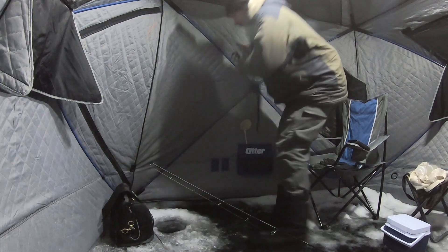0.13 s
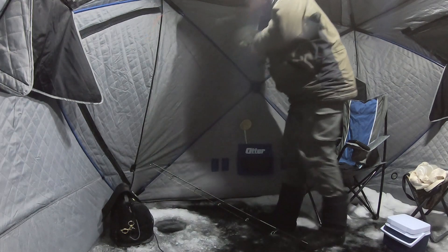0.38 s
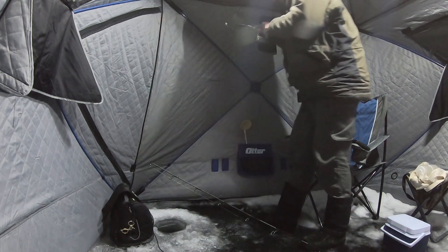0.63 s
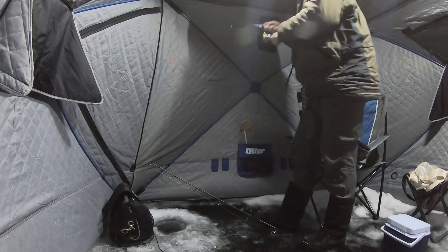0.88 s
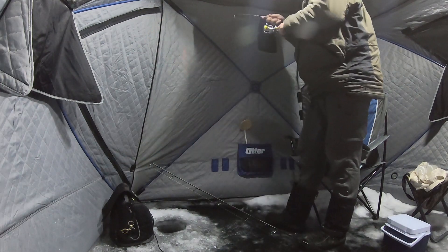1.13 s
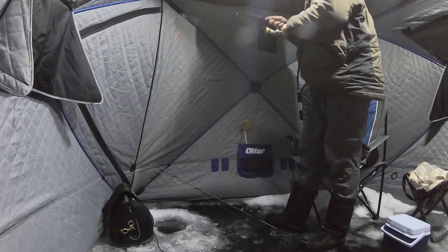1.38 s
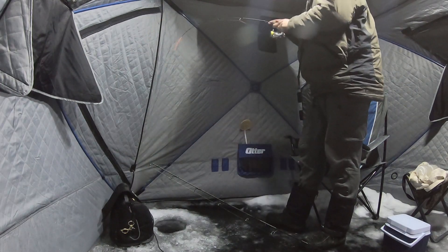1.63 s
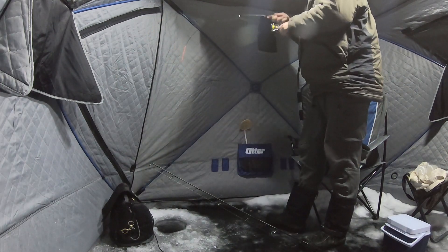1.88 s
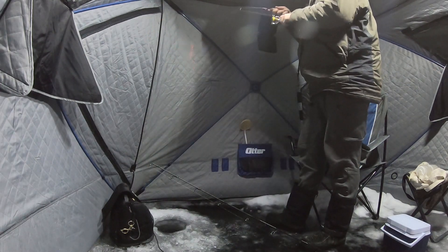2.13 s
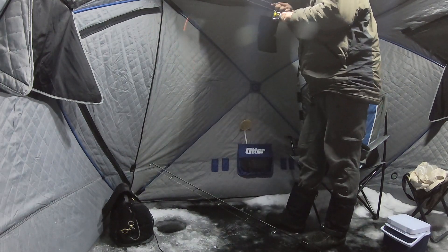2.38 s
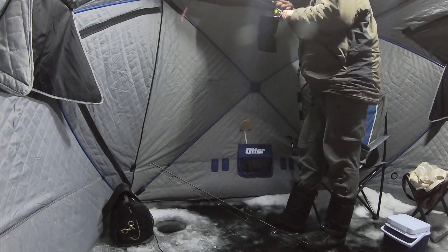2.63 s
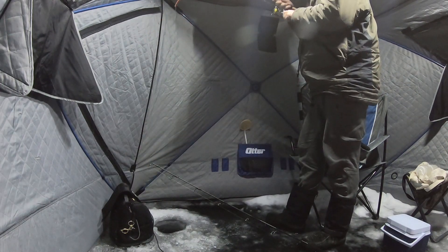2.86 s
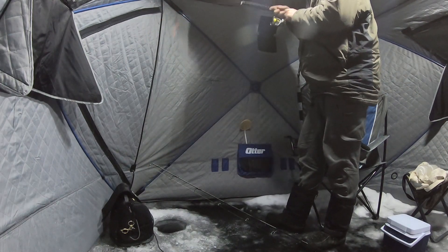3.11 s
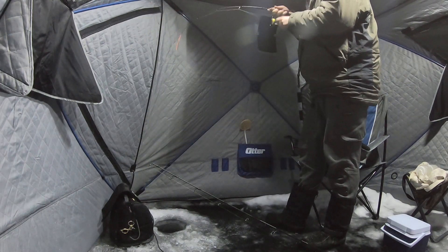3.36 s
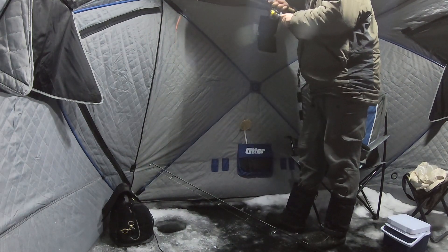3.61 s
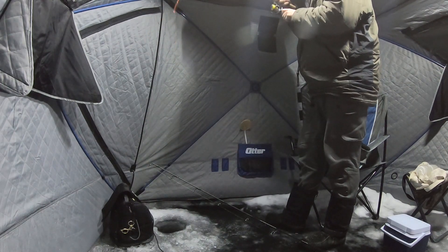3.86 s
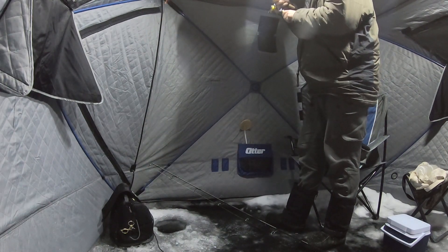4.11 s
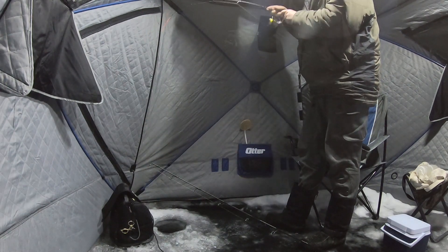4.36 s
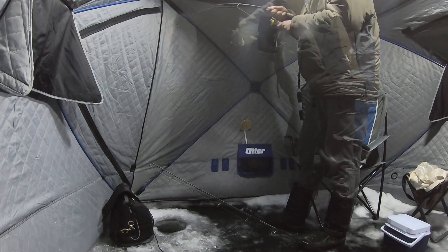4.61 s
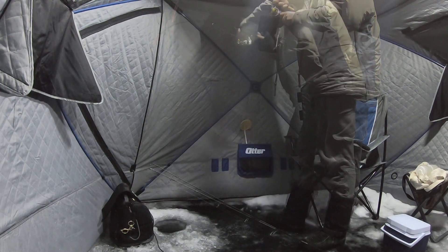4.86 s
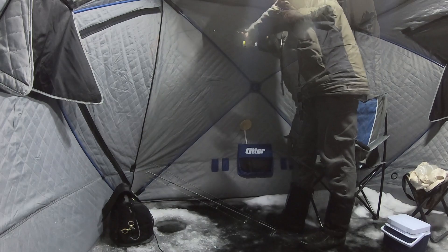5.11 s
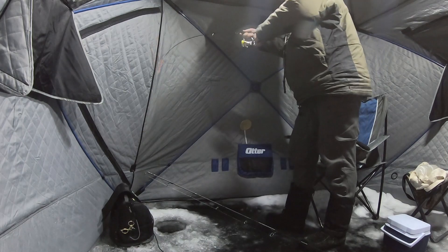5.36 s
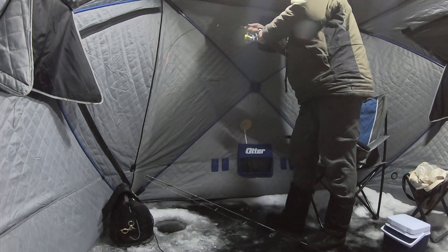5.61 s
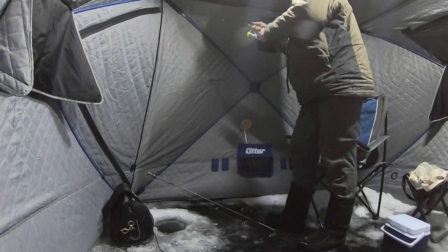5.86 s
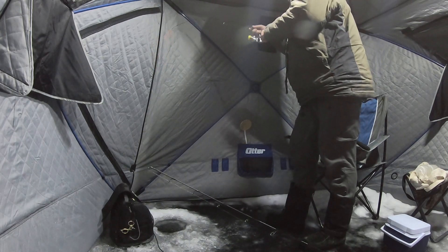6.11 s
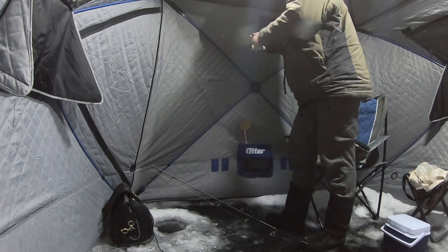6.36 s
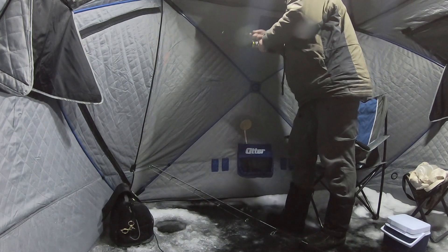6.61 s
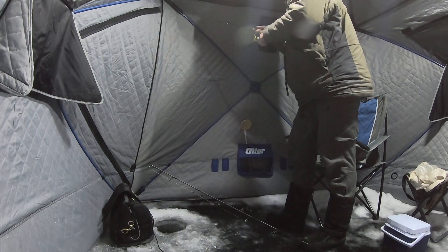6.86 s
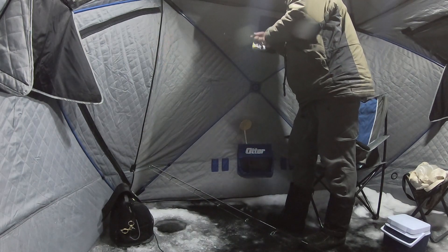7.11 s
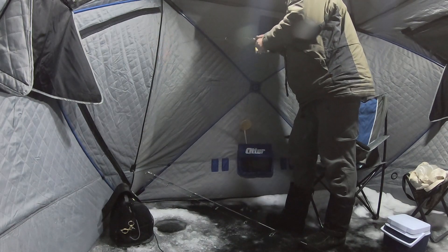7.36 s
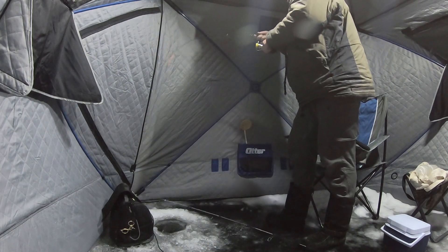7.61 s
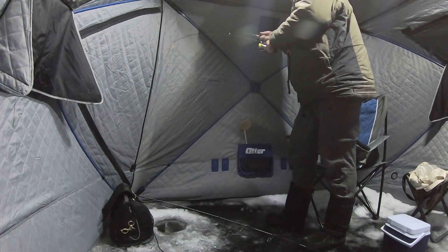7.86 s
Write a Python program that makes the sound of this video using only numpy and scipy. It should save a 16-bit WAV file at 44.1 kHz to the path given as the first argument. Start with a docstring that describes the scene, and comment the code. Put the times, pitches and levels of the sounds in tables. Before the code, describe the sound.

Inside a small, padded tent on ice, close to a stereo microphone, boots thump and a nylon jacket rustles briskly. A reel then clicks in quick uneven bursts with a thin metallic ring, pausing and resuming. A boot drags and bumps late, followed by hard plastic knocks and a few last ticks over a very faint heater hiss.

```python
"""Inside a small padded fishing tent on the ice, a reel is turned in short spells close to a two-port microphone.
Its clicker spring ticks over the spool's teeth: noise bursts ring spool and rod, and the spring sings one note.
Around it a nylon jacket rustles (patchy noise) and zips (gliding notes), and plastic parts knock (damped modes).
A boot drags (stick-slip pulses) and thumps (damped swings); a heater hums and hisses (filtered noise)."""
import sys
import numpy as np
from scipy import signal
from scipy.fft import rfft, irfft, next_fast_len
from scipy.io import wavfile
from scipy.ndimage import uniform_filter1d, map_coordinates

SR = 44100
rng = np.random.default_rng(int(sys.argv[2]) if len(sys.argv) > 2 else 0)


def linear_from_db(decibels):
    """Turn decibels (scalar or array-like) into linear amplitude factors; 0 gives 1."""
    return 10 ** (np.asarray(decibels, float) / 20)


def dump(signal):
    """Clip the signal to [-1, 1] and save it as 16-bit WAV at the path in sys.argv[1]."""
    limited = np.clip(np.atleast_2d(signal).T, -1, 1)
    pcm = np.round(limited * 32767).astype(np.int16)
    wavfile.write(sys.argv[1], SR, pcm)


N = 352359

# clicker ticks: (start [s], level [dB], rattle over level [dB], spring ring before its common gain [dB])
TICKS = [(0.6935, -28.5, 4.5, -43), (0.7283, -28.5, 2.5, -52), (0.823, -25.5, -8, -54),
         (0.905, -23, -5, -46), (0.9227, -24, 0, -44.5), (0.9533, -27.5, 3.5, -44),
         (1.005, -24.5, 3.5, -44), (1.0482, -28, 6.5, -46), (1.077, -26.5, 4, -51), (1.1, -23.5, 1, -39.5),
         (1.121, -24, 0.5, -55), (1.142, -24, 1.5, -41), (1.1732, -23, 2.5, -62), (1.207, -23, -1, -43.5),
         (1.236, -24.5, 2.5, -40), (1.282, -24.5, 1, -40.5), (1.3207, -27, 4, -53),
         (1.3507, -26.5, 4.5, -47.5), (1.3866, -27.5, 3, -38.5), (1.4182, -25, -4, -47.5),
         (1.4487, -25, -0.5, -56.5), (1.472, -29.5, 6, -45.5), (1.4914, -26.5, 1, -53.5),
         (1.51, -28, 5.5, -43), (1.537, -28, 7, -48), (1.6021, -26, 1.5, -44.5), (1.6439, -25.5, 4, -46),
         (1.712, -25.5, 2.5, -46), (1.7568, -26.5, 3, -45.5), (1.814, -24.5, -1, -56.5),
         (1.8298, -24.5, 8.5, -63), (1.8413, -29, 2.5, -53.5), (1.8577, -25, 4, -54.5),
         (1.875, -23, -5.5, -51.5), (1.897, -24.5, 3.5, -49.5), (1.975, -28, 6.5, -53),
         (2.0193, -26.5, 4.5, -48), (2.039, -24, 1.5, -53), (2.0627, -26, 3.5, -56), (2.1, -26.5, 3, -54.5),
         (2.166, -27, 4.5, -52.5), (2.645, -27.5, 3.5, -49), (2.8604, -29, 6.5, -45.5),
         (2.9669, -27.5, 8.5, -39), (3.053, -29.5, 7, -48), (3.109, -23.5, 2, -48),
         (3.1431, -26, 3.5, -45.5), (3.177, -26.5, 4, -51), (3.2086, -28.5, 5.5, -45.5),
         (3.2421, -29.5, 2, -51.5), (3.276, -28.5, 7, -44), (3.306, -28, 4.5, -51),
         (3.3298, -25.5, 3, -43.5), (3.359, -27, 5, -48.5), (3.3781, -27.5, 6, -48),
         (3.3955, -23.5, -6.5, -43), (3.4104, -24, 2, -50), (3.4286, -23, -1, -42), (3.4457, -23, 4.5, -45),
         (3.464, -25.5, 6.5, -41), (3.4777, -25, 3, -46.5), (3.4944, -24, 3, -51), (3.516, -26, 4, -46.5),
         (4.0653, -26.5, 5, -49), (4.191, -24, 1.5, -45), (4.264, -23, 2.5, -46.5),
         (4.366, -24.5, 2.5, -42.5), (4.4919, -25, 4.5, -40.5), (4.56, -25, 2.5, -48),
         (4.589, -27.5, 4, -48.5), (4.6226, -28.5, 2.5, -49), (4.653, -31, 5.5, -47),
         (4.6775, -31, 7.5, -59.5), (4.705, -28, 2.5, -65.5), (4.743, -31, 4.5, -60),
         (5.254, -23.5, 2.5, -40.5), (5.327, -23, 4.5, -38.5), (5.364, -22.5, 0, -50),
         (5.3905, -23.5, 1, -46.5), (5.412, -35.5, 2, -54), (5.435, -24.5, 1, -47.5), (6.476, -26, -1, -50),
         (7.5428, -25.5, 3, -45), (7.6123, -27, 6.5, -48), (7.885, -26, 3.5, -53.5)]
# spectrum of crisp nylon rustle, shared by knocks and spool hiss: (frequency [Hz], relative level per Hz [dB])
CRISP = [(1470, -21), (2500, -11), (3520, -6.5), (4890, -3), (6690, 0.5), (8290, -7.5), (9730, -2.5),
         (14100, -38), (15500, -23)]
LEAD_S = 0.0021  # the spring slips off the tooth this long before it lands


def unit(x):
    """Scaled to rms 1."""
    return x / np.sqrt(np.mean(x ** 2) + 1e-20)


def along(points, hz):
    """(Hz, value) points read on a log frequency axis."""
    f, v = np.transpose(points)
    return np.interp(np.log(hz + 1), np.log(f + 1), v)


def curves(rows):
    """One value per sample for each column after the time."""
    s, *cols = np.transpose(rows)
    return [np.interp(np.arange(N) / SR, s, c) for c in cols]


def wobble(rate):
    """A smooth random curve, rate knots a second."""
    knots = rng.standard_normal(int(N * rate / SR) + 4)
    return map_coordinates(knots, [np.arange(N) * rate / SR])


def filtered(x, response):
    """x times a complex response of frequency."""
    m = next_fast_len(N + SR // 2)
    return irfft(rfft(x, m) * response(np.fft.rfftfreq(m, 1 / SR)), m)[..., :N]


def resonant(peaks):
    """Causal response of (Hz, width Hz, dB) resonances, summed with alternating sign."""
    def response(f):
        total = 0
        for k, (centre, width, db) in enumerate(peaks):
            loss = 1j * f * width
            total = total + (-1) ** k * linear_from_db(db) * loss / (centre * centre - f * f + loss)
        return total
    return response


def turned(drive, peaks, share, shift):
    """A moving resonance group: a cross-fade of a lowered and a raised set."""
    share = np.clip(share, 0, 1)
    raised = filtered(drive, lambda f: resonant(peaks)(f / shift))
    lowered = filtered(drive, lambda f: resonant(peaks)(f * shift))
    return share * raised + (1 - share) * lowered


def spread(pair):
    """Two unrelated signals mixed into left and right, as alike as the two microphone ports hear them."""
    # likeness of the ports: (frequency [Hz], left-right correlation [0-1])
    likeness = [(50, 0), (300, 0.01), (700, 0.225), (1400, 0.042), (3100, 0.55), (4500, 0.43), (6800, 0)]

    def mid_side_gains(hz):
        angle = np.arccos(np.clip(along(likeness, hz), -1, 1)) / 2
        return np.array([np.cos(angle), np.sin(angle)])
    mid, side = filtered(pair, mid_side_gains)
    return np.array([mid + side, mid - side])


def rush(spectrum, patchy_db, size=512, bass=((0, 0),)):
    """Stereo noise of rms 1 with short narrow patches of random gain; bass is a (s, dB) curve for the low end."""
    hz, s, z = signal.stft(rng.standard_normal((2, N)), SR, nperseg=size)
    field = uniform_filter1d(rng.standard_normal(z.shape[1:]), size=3, axis=0)
    field = uniform_filter1d(field, size=3072 // size, axis=1)
    low_db = np.interp(s, *np.transpose(bass)) / (1 + (hz[:, None] / 892) ** 4)  # fades out around 892 Hz
    pair = signal.istft(z * linear_from_db(patchy_db * unit(field) + low_db), nperseg=size)[1][:, :N]
    return unit(spread(filtered(pair, lambda hz: linear_from_db(along(spectrum, hz)))))


def add(track, s, sound):
    """Mix a sound into a track from time s."""
    part = track[..., round(s * SR):][..., :sound.shape[-1]]
    part += sound[..., :part.shape[-1]]


def tent(x):
    """The quilted walls answer briefly, differently at each port: x convolved with decaying noise."""
    # decay of the walls' answer: (frequency [Hz], t60 [s])
    wall_decay = [(2000, 0.158), (6000, 0.026), (12000, 0.067)]
    hz, t, z = signal.stft(rng.standard_normal((2, SR // 3)), SR, nperseg=256)
    tail = signal.istft(z * linear_from_db(-60 * t / along(wall_decay, hz)[:, None]), SR, nperseg=256)[1]
    late = np.pad(x, (150, 0))[None]  # 150 samples of delay
    return signal.fftconvolve(late, tail / np.linalg.norm(tail[0]), axes=1)[:, :N]


def heater():
    """Steady gas hiss with a wavering burner note, fuzzy as noise through a narrow resonance."""
    # hiss spectrum: (frequency [Hz], relative level per Hz [dB])
    hiss_spectrum = [(15, -51), (25, -12.5), (91, -23), (178, -0.5), (267, -11), (482, -16), (537, -18.5),
                     (782, -4.5), (945, -13), (1020, -27), (1110, -11.5), (2060, -34), (6730, -12),
                     (9550, -16), (15500, -36)]
    # burner note: (time [s], level [dB])
    hum_levels = [(0, -80), (1.7, -85.5), (1.9, -74.5), (2.5, -68), (2.7, -94.5), (3.25, -67.5),
                  (3.6, -107.5), (6.3, -98), (6.45, -89.5), (6.95, -63), (7.05, -67), (7.55, -79),
                  (7.65, -99)]
    note_shape = resonant([(275, 40, 0)])
    note = unit(filtered(rng.standard_normal((2, N)), lambda f: note_shape(f) ** 2))
    hiss = linear_from_db(-66) * rush(hiss_spectrum, patchy_db=2.0)
    return hiss + linear_from_db(curves(hum_levels)[0]) * spread(note)


def thumps():
    """A boot on the ice gives a damped swing and a short noisy scuff."""
    # boot blows: (time [s], level [dB], pitch [Hz], t60 [s])
    boot_blows = [(.001, -28, 811, 0.054), (0.048, -27, 276.3, 0.054), (0.053, -32.5, 164, 0.1),
                  (.058, -20, 651, 0.0168), (.059, -27.5, 1250, 0.0176), (0.067, -24, 410, 0.0143),
                  (.069, -24.5, 1110, .02), (0.079, -26.5, 497, 0.021), (0.14, -49, 156, 0.24),
                  (6.262, -38.5, 61.7, 0.164), (6.2636, -22, 1060, 0.0041), (6.266, -39.5, 108, 0.089),
                  (7.429, -55, 146, 0.13)]
    out, t = np.zeros(N), np.arange(SR // 3) / SR
    for s, db, hz, t60 in boot_blows:
        swing = linear_from_db(-60 * t / t60) * np.sin(2 * np.pi * hz * t)
        scuff = 0.07 * linear_from_db(-60 * t / 0.0092) * rng.standard_normal(len(t))
        add(out, s, linear_from_db(db) * (swing + scuff))
    return out


def drag():
    """A boot drags over the ice: stick-slip pulses at an unsteady rate ring the rubber sole."""
    # the drag: (time [s], mean slip rate [1/s], level before flutter [dB])
    slip_course = [(6.04, 530, -75.5), (6.1, 626.5, -46), (6.19, 610, -41), (6.21, 1140, -39),
                   (6.26, 910, -44), (6.29, 834, -60.5), (6.33, 737, -55), (6.37, 900, -53),
                   (6.45, 920, -58.5), (6.55, 920, -63.5), (6.62, 1100, -83)]
    # sole resonances: (centre [Hz], width [Hz], relative level [dB])
    sole_modes = [(512.5, 93, 2), (847.4, 100, 4), (1140, 18, 5), (1250, 55, -5), (1950, 100, -5.5),
                  (2390, 104, 2), (2650, 166, 1.5)]
    rate, db = curves(slip_course)
    turns = np.cumsum(rate * (1 + .06 * wobble(150))) / SR
    slips = np.diff(np.floor(turns), prepend=0) * (1 + 0.4 * rng.standard_normal(N))
    sole = unit(filtered(slips, resonant(sole_modes))) * linear_from_db(db + 3.2 * wobble(60))
    return sole * (db > -74)


def knocks():
    """Every blow rings most the plastic modes nearest its own pitch, a little roughly, with a crisp crack."""
    # knocks: (time [s], level [dB], crack over level [dB], favoured pitch [Hz])
    plastic_blows = [(0.26, -18.5, -14, 3520), (4.844, -41, -36, 1950), (6.261, -23, -16.5, 3000),
                     (7.3564, -16.5, -8.5, 3430), (7.3573, -24.5, -26.5, 1430), (7.4244, -14, -14.5, 2135),
                     (7.949, -23, -10, 2275), (7.958, -35.5, -6, 2080)]
    # modes of the plastic: (frequency [Hz], level before pitch and chance [dB], t60 [s])
    plastic_modes = [(847, 6, 0.044), (1011, 1, 0.06), (1585, -5.5, 0.0421), (1900, -5.5, 0.019),
                     (2260, -4, 0.036), (2960, -6, 0.015), (3379, -5, 0.019), (3815, -13.5, 0.046),
                     (3980, -4.5, 0.017), (4537, -8, 0.056)]
    graze_s, build_cycles = 0.0054, 2.14  # a knock grazes before it lands; each mode builds up over some cycles
    body, cracks, t = np.zeros(N), np.zeros((2, N)), np.arange(SR // 5) / SR
    hz, mode_db, t60 = np.transpose(plastic_modes)[..., None]
    for s, db, crack_db, centre_hz in plastic_blows:
        chance = rng.normal(0, 2, mode_db.shape)
        strength = mode_db + chance - 18 * np.abs(np.log2(hz / centre_hz))  # 18 dB less an octave away
        drift = .05 * np.cumsum(rng.standard_normal((len(hz), len(t))), axis=1)  # roughens the phase
        swell = 1 - np.exp(-t * hz / build_cycles)
        modes = swell * linear_from_db(strength - 60 * t / t60) * np.sin(2 * np.pi * hz * t + drift)
        add(body, s, linear_from_db(db) * np.sum(modes, axis=0))
        fade = (1 - np.exp(-t / graze_s)) * linear_from_db(-60 * t / 0.14)
        add(cracks, s - graze_s, linear_from_db(db + crack_db) * fade * rng.standard_normal((2, len(t))))
    colour = lambda f: linear_from_db(along(CRISP, f) + 4.6 * np.log2(f / 6000 + 1))  # crisp, tilted to the treble
    return body, spread(filtered(cracks, colour))


def jacket():
    """Nylon sleeves rub in swelling strokes of patchy noise; creases crackle on top."""
    # strokes: (peak time [s], level [dB], rise by 20 dB [s], fall by 20 dB [s], crisp rustle over rubbing [dB])
    # the sign of rise and fall does not count
    strokes = [(.003, -36, -0.5, 0.11, -2), (0.039, -36, -2, 0.06, -3), (0.06, -33, .04, .04, -6),
               (.12, -44.5, -2.5, 0.3258, -1), (0.157, -37, -0.05, 0.0914, -3),
               (0.199, -39.5, 0, 0.0652, -5.5), (.248, -39, .015, 0.1112, -6.5),
               (0.267, -38.5, 0.07, 0.1335, 4.5), (0.358, -32, -0.0035, 0.01, -15),
               (0.385, -37, 0.0233, 0.0418, 7.5), (0.408, -48.5, -0.05, 0.1429, 3.5),
               (0.458, -44.5, -1, 0.21, -8), (0.618, -50, 0.1, 0.1444, 0), (.76, -47.5, 0.23, 0.1961, -4),
               (.85, -45.5, 0.26, 0.27, -0.5), (1.03, -49, 0.2142, 0.0926, 4), (1.461, -53.5, 0.7, 1, 6),
               (1.779, -46.5, 0.27, 0.41, -3), (2.029, -54, 0.27, 0.05, 3), (2.902, -58, 0.1, 1.8, -6),
               (3.02, -51, 0.09, 0.47, -1.5), (3.085, -49.5, -0.04, 0.38, 0),
               (3.237, -47.5, -0.01, 0.3212, 2), (3.55, -61, 0.14, 0.5, -1), (3.82, -59.5, 0.4, -0.22, 0),
               (4.138, -50, -0.05, 0.9, -6.5), (4.234, -47, 0.03, 0.34, -3.5),
               (4.43, -49, -0.36, 0.4, -3.5), (4.54, -45.5, -0.18, -0.05, -9),
               (4.78, -56.5, 0.0244, 0.2954, -0.5), (4.86, -56, -0.1, 0.06, -3),
               (4.975, -55, -0.1, -0.04, -3), (5.07, -53.5, 0.17, 0.37, -12), (5.21, -49, 0.12, 0.1, -6.5),
               (5.4, -59.5, 0.38, 0.34, 6.5), (5.657, -69, 0.1, 0.5, 5.5),
               (6.109, -48.5, -0.104, 0.4653, -8), (6.231, -39.5, 0.03, 0.25, -6.5),
               (6.441, -46, 0.3452, 0.16, -4), (6.547, -55.5, 0.28, 0.2, 2.5), (6.7, -64.5, 1.2, 0.5, 4.5),
               (7.0, -51, 0.1, 0.4046, -19), (7.079, -43.5, 0.1243, 0.0925, -3.5),
               (7.129, -46, 0.0758, 0.23, -6), (7.291, -47.5, 0.04, 0.15, -7), (7.4, -44.5, 0.22, 0.07, -7),
               (7.72, -66, 1, -2.5, 2.5), (7.79, -57.5, .08, 8.5, -0.5), (7.99, -49, -0.03, 1.4, -3)]
    # rubbing spectrum: (frequency [Hz], relative level per Hz before the bass curve [dB])
    rub_spectrum = [(50, -56), (150, -22), (250, -16.5), (530, -14.5), (681, -12), (802, -10), (1280, -3),
                    (1600, -3), (1950, 0), (2300, -5), (2950, -6), (5000, -14.5), (6500, -51),
                    (11000, -120)]
    # bass of the rubbing: (time [s], gain [dB])
    rub_bass = [(0, 8.5), (.3, 3), (.36, -2.5), (1.1, 1.5), (2.9, -6), (4.2, -8.5), (4.6, -1.5), (5.1, 1.5),
                (7, 3)]
    s, db, rise, fall, crisp_db = np.transpose(strokes)[..., None]
    grid = np.arange(0, N / SR, 1 / 500)  # levels are set every 2 ms
    distance = np.abs(np.where(grid > s, (grid - s) / fall, (s - grid) / rise))
    stroke_db = db - 20 * distance ** 0.96  # an exponent above 1 would round a stroke's top

    def total_level(each_db):
        return np.interp(np.arange(N) / SR, grid, np.sqrt(np.sum(linear_from_db(each_db) ** 2, axis=0)))
    rub = rush(rub_spectrum, patchy_db=3.7, size=1024, bass=rub_bass)
    creases = linear_from_db(0.5 * wobble(90) + wobble(600))
    crisp = unit(creases * rush(CRISP, patchy_db=2.5))
    return total_level(stroke_db) * linear_from_db(0.96 * wobble(60)) * rub + total_level(stroke_db + crisp_db) * crisp


def zips():
    """The weave sings as ribs of thread zip over each other: short gliding, blurred notes with two overtones."""
    # zips: (centre [s], half-length [s], first pitch [Hz], last pitch [Hz], level before flutter [dB],
    #        step from one overtone to the next [dB])
    weave_notes = [(.038, 0.0111, 2625, 2624, -35, -8), (0.36, .014, 990, 992.6, -44, 6.5),
                   (0.38, .014, 1067, 1070, -43, 6), (.46, 0.0378, 1650, 1579, -52, -17),
                   (0.614, 0.0523, 1300, 1247, -52, -2), (0.829, 0.095, 1804, 1800, -53.5, -10),
                   (1.759, 0.195, 1950, 1863, -52, -10.5), (1.787, .06, 1280, 1167, -57, -8.5),
                   (2.905, 0.051, 1500, 1588, -57.5, -18.5), (2.951, 0.097, 1900, 1950, -58, -11.5),
                   (3.027, .03, 1246, 1289, -46.5, -2.5), (3.094, 0.053, 1970, 1950, -47, -13.5),
                   (3.117, 0.061, 1000, 970, -61, -8), (3.229, 0.087, 1867, 1920, -55, -7),
                   (4.231, 0.0633, 1270, 1298, -50.5, -2), (4.489, 0.0475, 1887, 1900, -46, -5),
                   (4.549, .08, 1950, 1784, -50, -16), (5.067, 0.095, 950, 1093, -60.5, -7),
                   (5.206, 0.0475, 2280, 2260, -53.5, -12), (5.245, 0.033, 1779, 1900, -50, -16.5),
                   (7.078, .03, 1446, 1458, -47, 1), (7.135, 0.077, 860, 848, -56, -2.5),
                   (7.32, .06, 2630, 2680, -53, -7.5)]
    out, order = np.zeros((2, N)), np.arange(1, 4)[:, None]
    wander = .055 * np.cumsum(rng.standard_normal(N))  # the phase drifts at random from sample to sample
    for s, half_s, first_hz, last_hz, db, step_db in weave_notes:
        u = np.linspace(0, 1, round(2 * half_s * SR) + 8)
        start = s - half_s
        glide = np.cumsum(first_hz + (last_hz - first_hz) * u) / SR
        phase = 2 * np.pi * glide + wander[round(start * SR):][:len(u)]
        note = np.sum(linear_from_db(step_db * (order - 1)) * np.sin(order * phase), axis=0)
        add(out, start, linear_from_db(db) * np.sin(np.pi * u) ** 4 * note)
    port_flutter = 1.7 * np.array([wobble(44), wobble(40)])
    return out * linear_from_db(4 * wobble(100) + port_flutter)


def whirr():
    """The spool hisses while it turns, the more the faster the ticks come."""
    level_db, lag_s = -68.5, 0.026  # level at one tick a second; lag behind the ticks
    marks = np.zeros(N)
    marks[np.round(np.transpose(TICKS)[0] * SR).astype(int)] = SR
    rate = np.abs(filtered(marks, lambda f: 1 / (1 + 2j * np.pi * f * lag_s / 2) ** 2))
    return linear_from_db(level_db) * rate ** 0.44 * rush(CRISP, patchy_db=5.5)


def spring():
    """The clicker spring rings on one note, which wall echoes make waver; each next tooth damps it."""
    # the spring: (pitch [Hz], t60 of the ping [s], t60 of the after-ring [s], after-ring under ping [dB])
    spring_note = (3942, .062, .22, -9)
    pitch_hz, ping_s, after_s, after_db = spring_note
    t = np.arange(SR // 4) / SR
    ping = linear_from_db(-60 * t / ping_s) ** 2 + linear_from_db(after_db - 60 * t / after_s) ** 2
    ping = ping * (1 - np.exp(-t / 0.004)) ** 2
    energy = np.zeros(N)
    for s, _, _, ring_db in TICKS:
        energy[round(s * SR):] *= linear_from_db(-5) ** 2  # what still rings is damped by 5 dB
        add(energy, s + LEAD_S, linear_from_db(ring_db) ** 2 * ping)
    note = np.exp(2j * np.pi * np.cumsum(pitch_hz + 14 * wobble(60)) / SR)
    beat = linear_from_db(1.5 * wobble(80) + 1.2 * np.array([wobble(60), wobble(60)]))
    ports = np.imag(note * np.exp([[.3j], [-.3j]]))  # a small phase offset between the ports
    return linear_from_db(6.0) * np.sqrt(np.abs(energy)) * beat * ports


def reel():
    """Each tick snaps into the spool, a diffuse rattle follows, and the landing shakes the reel foot and rod."""
    # lower and upper spool resonances: (centre before turning [Hz], width before turning [Hz], level [dB])
    spool_low = [(3880, 323, -12.5), (5914, 205, 6.5), (6383, 500, 4.5), (6870, 920, -4.5)]
    spool_top = [(9690, 350, 9.5), (10500, 2100, -13.5), (12130, 1100, -16)]
    # reel foot and rod: (centre [Hz], width [Hz], level [dB])
    rod_modes = [(1900, 280, -8), (2760, 590, -6.5)]
    # the hand turns the reel and higher or lower modes face the ports:
    # (time [s], share of raised modes in the lower group [0-1], in the upper group [0-1])
    hand_turn = [(.7, 0.44, 0.63), (1.1, 0.66, 0), (1.55, 0.67, 0), (1.9, 0.44, 0.69), (2.9, 0.47, 0.38),
                 (3.45, 0.47, 0.96), (4.2, 0.59, 0), (4.7, 0.36, 0.6), (5.3, 0.68, 0.03), (6.48, .05, 0.6),
                 (7.6, 0.54, 0.05)]
    lead, snap_s = 0.5, .0003  # strength of the slip off the tooth; time in which a blow peaks
    snap_db, top_db, top_scatter_db = 6.5, -9, 1.5  # snap and upper band over the tick's level; chance in the latter
    t = np.arange(SR // 4) / SR

    def blow(u):
        u = np.maximum(u, 0) / snap_s
        return u * np.exp(1 - u)
    snap = lead * blow(t) + blow(t - LEAD_S)
    jab = linear_from_db(snap_db) * snap
    burst = np.exp(-t / .004)  # the share that dies first, beside a steadier part
    rattle = (1 - np.exp(-t / 0.0017)) * linear_from_db(-60 * t / 0.19) * (0.72 + burst)
    shiver = (1 - np.exp(-t / LEAD_S)) * linear_from_db(-60 * t / .03)
    low, top, jolt = np.zeros((3, 2, N))
    for s, db, rattle_db, _ in TICKS:
        noise = rng.standard_normal((2, 2, len(t)))  # lower and upper group, each with mid and side
        strength = np.sqrt(np.sum((snap * noise) ** 2, axis=-1, keepdims=True) / np.sum(snap ** 2))
        noise = noise / strength ** np.clip(snap, 0, 1)  # evens out the strength of the snaps
        click = np.zeros((2, len(t)))
        lag = rng.integers(7)  # samples by which the side echo lags
        for at, size in ((0, lead), (round(LEAD_S * SR), 1)):
            click[0, at] = click[1, at + lag] = linear_from_db(19) * size * rng.choice([-1, 1])
        tick_top_db = db + top_db + top_scatter_db * rng.standard_normal()
        add(low, s, linear_from_db(db) * ((linear_from_db(rattle_db) * rattle + jab) * noise[0] + click))
        add(top, s, linear_from_db(tick_top_db) * ((rattle + 0.5 * jab) * noise[1] + 0.6 * click))
        add(jolt, s, linear_from_db(db) * shiver * noise[1])
    low_share, top_share = curves(hand_turn)
    spool = turned(low, spool_low, low_share, shift=1.04) + turned(top, spool_top, top_share, shift=1.022)
    return spread(spool + filtered(jolt, resonant(rod_modes)))


def scene():
    """Everything in the tent; the walls answer the boots, the drag and the ringing plastic."""
    body, cracks = knocks()
    blows = filtered(body + drag(), lambda f: 1 / (1 - 300j / (f + 1)) ** 2)  # small parts radiate little bass
    blows = blows + linear_from_db(-7.0) * tent(blows)
    boots = filtered(thumps(), lambda f: 1 / (1 - 40j / (f + 1)) ** 3)
    boots = boots + linear_from_db(-13) * tent(boots)
    return heater() + boots + blows + cracks + jacket() + zips() + whirr() + spring() + reel()


def low_pass(x):
    """Removes everything above the highest recorded frequency."""
    return signal.sosfilt(signal.butter(12, 15790, fs=SR, output="sos"), x)


def record(dry):
    """The two microphone ports differ in tone, and nothing from 15.8 kHz up is kept."""
    # balance of the ports: (frequency [Hz], left minus right [dB])
    port_lean = [(100, 0.5), (1500, 0), (5500, 0), (7500, -3), (9000, 4), (14000, 2.5)]

    def port_gains(hz):
        half_db = along(port_lean, hz) / 2
        return (hz < 15800) * linear_from_db(half_db * np.array([[1], [-1]]))
    ports = filtered(dry, port_gains)
    return low_pass(ports)


dry = scene()
out = record(dry)
dump(out)
```